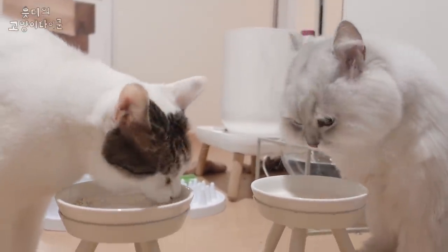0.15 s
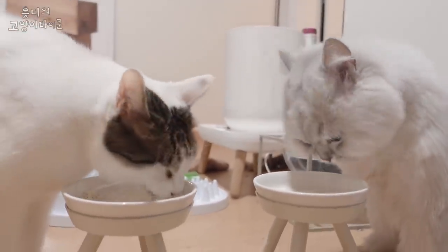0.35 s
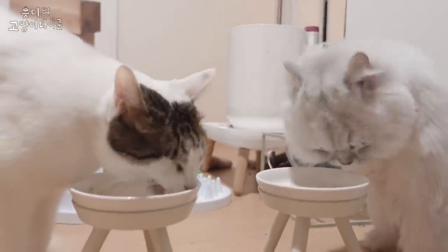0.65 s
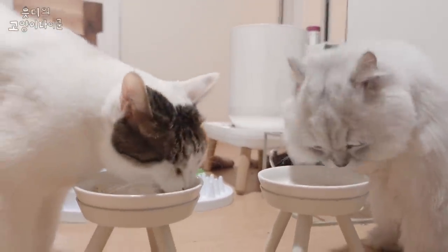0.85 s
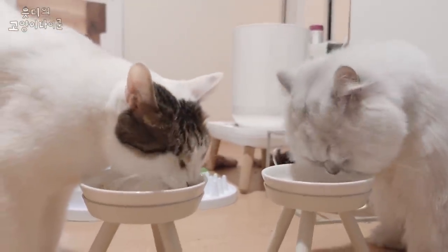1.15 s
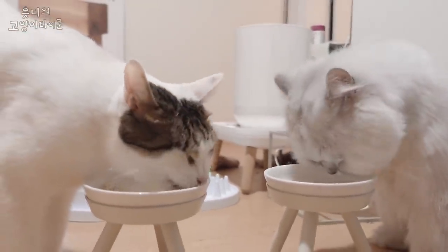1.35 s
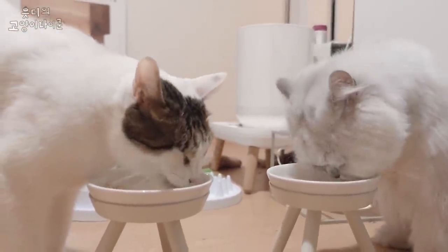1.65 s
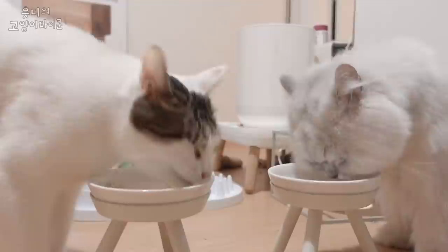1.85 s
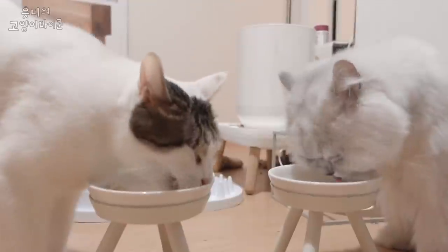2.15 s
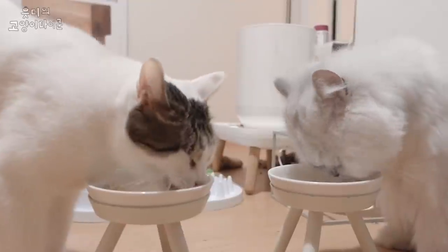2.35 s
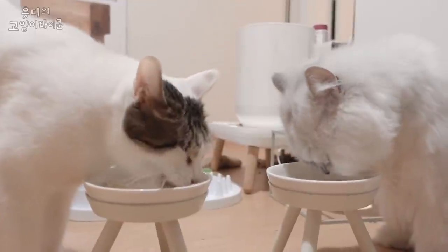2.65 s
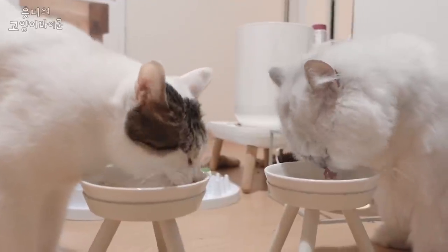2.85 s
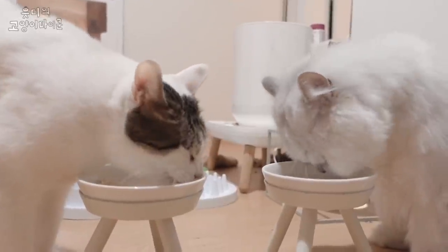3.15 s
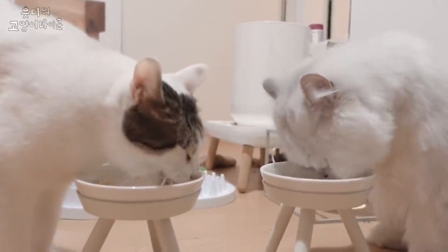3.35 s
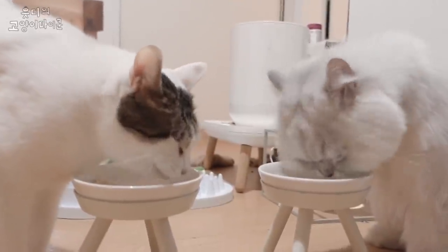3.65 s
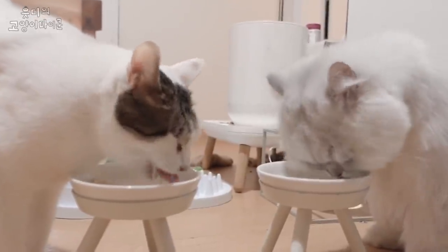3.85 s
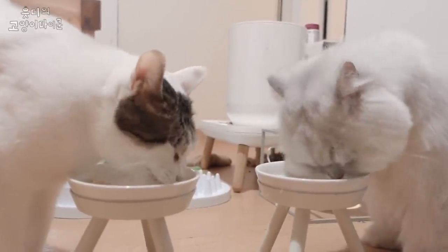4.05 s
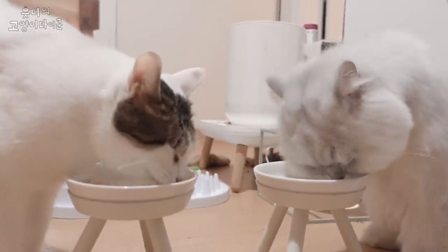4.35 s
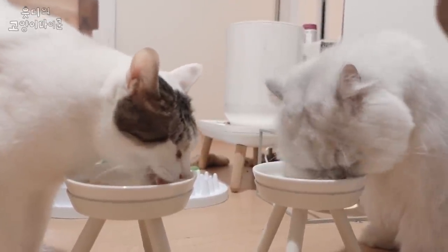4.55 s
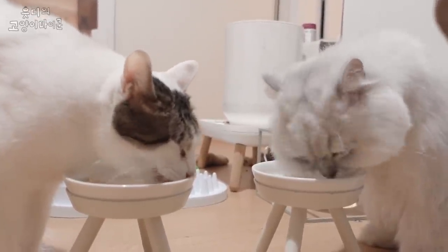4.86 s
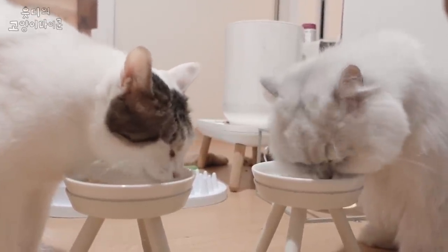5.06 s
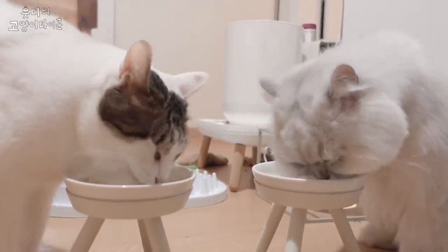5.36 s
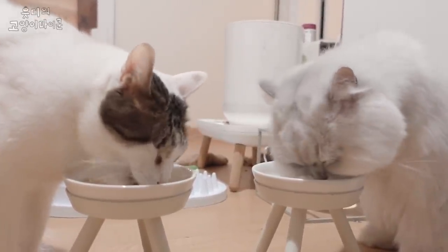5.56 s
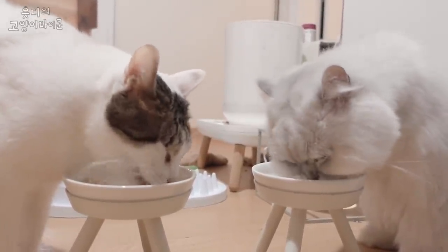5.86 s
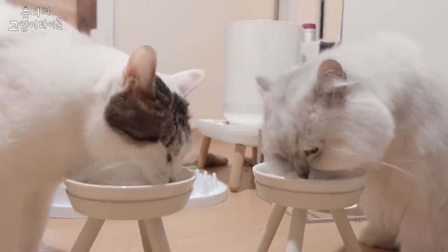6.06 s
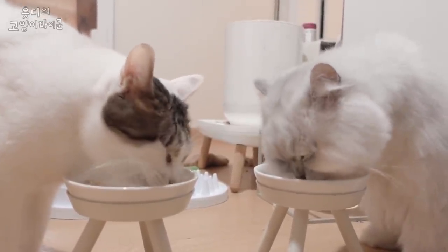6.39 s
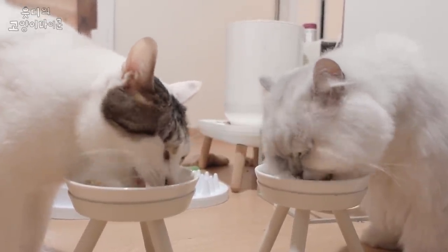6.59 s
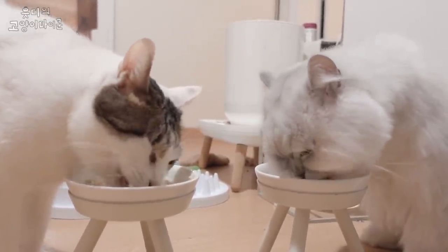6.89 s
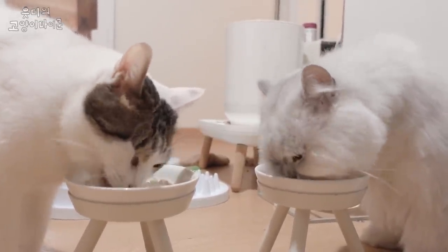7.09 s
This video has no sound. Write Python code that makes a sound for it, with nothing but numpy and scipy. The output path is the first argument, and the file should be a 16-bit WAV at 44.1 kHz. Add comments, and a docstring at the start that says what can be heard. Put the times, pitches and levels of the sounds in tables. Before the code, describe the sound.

Close wet smacking, licking and chewing of two cats at their bowls, with soft stand judders over a low room rumble.

```python
"""Two cats eating wet food

Close by in a small room, tongues lap about three times a second and squelch the food. Saliva films snap,
lips open tiny wet cavities that pop, and saliva crackles after each smack. Licks and nudges shake the
bowls' wooden stands with low judders and a few dull bumps, over a deep rumble and room noise."""
import sys
import numpy as np
from scipy import signal
from scipy.fft import rfft, irfft, next_fast_len
from scipy.io import wavfile
from scipy.ndimage import uniform_filter1d, map_coordinates

SR = 44100
rng = np.random.default_rng(int(sys.argv[2]) if len(sys.argv) > 2 else 0)


def unload_audio(sound):
    """Save the sound as a 16-bit wav file, at the path given as the first command line argument."""
    columns = np.transpose(np.atleast_2d(sound))
    # keep every value between -1 and 1, then stretch to whole-number steps
    steps = np.round(np.clip(columns, -1, 1) * 32767)
    wavfile.write(sys.argv[1], SR, steps.astype(np.int16))


N = 318710

# lip and tongue smacks: start_s, pop_db, cavity_hz, ring_cycles, snap_db
SMACK_EVENTS = [(.0248, -29, 1720, 1.1, -32), (0.0874, -19, 1580, 1.1, -22), (0.1016, -30, 2060, 1.1, -23),
                (0.1119, -17, 1910, 0.72, -11.5), (0.1201, -24, 2200, 1, -19.5),
                (.14, -17.5, 2770, 0.43, -38), (0.3474, -15.5, 3780, 2.2, -39),
                (0.3605, -8, 3890, 2.2, -42), (.4106, -28, 3680, 3, -29), (0.4229, -18, 1910, 0.68, -20),
                (0.4367, -22, 2070, 0.58, -12.5), (.454, -21.5, 1850, 1.2, -39),
                (0.4938, -23, 1750, 1.6, -43), (0.5504, -27, 1730, 1.2, -39), (0.5976, -26, 1690, 1.6, -32),
                (0.7412, -21.5, 2280, 1.4, -23), (0.7653, -23.5, 2610, 0.89, -25),
                (0.8322, -26, 1220, 0.94, -25), (0.853, -25.5, 1870, 1.4, -24),
                (1.0725, -28, 1100, 2.3, -37), (1.101, -31.5, 2660, 2.9, -22.5),
                (1.1694, -24, 2680, 1.7, -39), (1.1896, -14, 2030, 1.1, -21),
                (1.2211, -27.5, 5550, 4.2, -44), (1.242, -18.5, 1960, 0.26, -35),
                (1.559, -30.5, 1640, 2.9, -39), (1.6392, -29.5, 1970, 1.7, -36),
                (1.6828, -21.5, 1140, 1.04, -26.5), (1.8301, -31, 4320, 2.6, -45),
                (2.109, -37, 4330, 3.3, -23), (2.1637, -24.5, 1310, 2.1, -33),
                (2.1811, -24.5, 3750, 3.6, -38), (2.185, -25, 1330, 1.6, -19),
                (2.2024, -18.5, 1630, 1.45, -31), (2.2075, -19, 1660, 1.7, -14),
                (2.2456, -20.5, 2030, 2.2, -29), (2.3462, -34, 1930, 1, -29),
                (2.604, -29.5, 3540, 2, -28.5), (2.636, -33.5, 1330, 1.2, -21), (2.6513, -30, 3520, 2, -34),
                (2.665, -19, 5540, 0.81, -34), (2.699, -26.5, 3750, 3.7, -29),
                (2.7692, -27, 3150, 1.8, -25), (2.9917, -21.5, 1650, 0.84, -42),
                (3.0318, -28.5, 2160, 2, -33), (3.521, -29.5, 2220, 0.88, -28.5),
                (3.6537, -22, 1700, 1.1, -51), (3.6662, -24, 1690, 1.6, -27.5),
                (3.817, -22, 5640, 4.5, -24.5), (3.8904, -26, 6450, 1.7, -20),
                (3.905, -15.5, 1200, 1.33, -33), (3.9927, -26.5, 1740, 1.9, -30),
                (4.1886, -21, 2400, 0.58, -22), (4.2023, -29.5, 2110, 1.7, -25.5),
                (4.2294, -26, 2120, 2.1, -34), (4.565, -25.5, 1620, 0.63, -41),
                (4.5796, -21.5, 1160, 1.04, -30), (4.856, -19, 2040, 0.3, -29.5),
                (4.9075, -32, 4640, 6.5, -19), (4.9699, -20, 1900, 0.94, -46), (5.268, -28, 1340, 1.1, -37),
                (5.2785, -19.5, 1400, 1.3, -40), (5.5515, -13, 1380, 0.99, -14.5),
                (5.5627, -10.5, 2460, 1.5, -33), (5.577, -13, 1650, 0.19, -23),
                (5.6278, -45, 1720, 0.9, -23), (5.695, -32, 1750, 0.77, -27), (5.883, -23, 2820, 0.34, -26),
                (6.1548, -14, 1450, 0.41, -24), (6.2005, -21.5, 1330, 0.71, -29),
                (6.5124, -21, 1490, .4, -35), (6.651, -31.5, 2580, 3.3, -41),
                (6.9804, -17.5, 2800, 2.1, -16), (7.1274, -21.5, 1460, 0.33, -36),
                (7.1492, -24, 1240, 0.68, -26)]
# droplet spray spectrum: freq_hz, level_db
SPRAY_SPECTRUM = [(3000, -51), (6000, -6), (7500, 9), (9500, 11), (11300, 2), (12700, -21), (16000, -38)]


def amp(db):
    """Decibels to gain."""
    return 10 ** (np.asarray(db) / 20)


def unit(x):
    """Scale to rms 1."""
    return x / np.sqrt(np.mean(x ** 2) + 1e-20)


def along(points, hz):
    """Read (freq_hz, value) points on a log axis."""
    freq_hz, values = np.transpose(points)
    return np.interp(np.log(hz + 1), np.log(freq_hz + 1), values)


def curve(points):
    """Read (time_s, value) points at every sample."""
    return np.interp(np.arange(N) / SR, *np.transpose(points))


def wobble(rate_hz):
    """Smooth random curve, rate_hz knots a second."""
    knots = rng.standard_normal(int(N * rate_hz / SR) + 4)
    return map_coordinates(knots, [np.arange(N) * rate_hz / SR])


def swell(length_s):
    """Smooth rise and fall, above half height for length_s."""
    return np.hanning(round(2 * length_s * SR))


def noise():
    """Fresh white noise."""
    return rng.standard_normal(N)


def filtered(x, response):
    """Apply a frequency response."""
    size = next_fast_len(len(x) + 4096)
    return irfft(rfft(x, size) * response(np.fft.rfftfreq(size, 1 / SR)), size)[:len(x)]


def coloured(x, spectrum):
    """Shape by (freq_hz, level_db) points, at rms 1."""
    return unit(filtered(x, lambda hz: amp(along(spectrum, hz))))


def resonated(x, centre_hz, width_ratio):
    """Two equal resonances in series, at rms 1."""
    def response(hz):
        damping = 1j * hz * width_ratio * centre_hz
        return (damping / (centre_hz ** 2 - hz ** 2 + damping)) ** 2
    return unit(filtered(x, response))


def add(track, start_s, sound):
    """Mix a sound into a track."""
    first = round(start_s * SR)
    part = sound[max(-first, 0):max(N - first, 0)]
    track[max(first, 0):][:len(part)] += part


def placed(start_s, sounds):
    """Sum one short sound per row, each at its start."""
    index = np.round(np.abs(start_s) * SR).astype(int)[:, None] + np.arange(sounds.shape[1])
    return np.bincount(index.ravel(), sounds.ravel(), N)[:N]


def background(rumble_db=-3, air_db=-47):
    """Deep unsteady rumble, soft room noise and faint drones."""
    # rumble swells: time_s, level_db
    rumble_levels = [(0, -11), (.82, -8.5), (.95, -15.5), (3.7, -14), (4.02, -10.5), (4.19, -19.5),
                     (4.77, -13.5), (6.6, -17.5), (7.23, -9)]
    # rumble and room noise spectra: freq_hz, level_db
    rumble_spectrum = [(3, -3.5), (8, -1.5), (24, -3.5), (34, -29), (50, -33), (70, -51), (120, -58),
                       (250, -96)]
    air_spectrum = [(40, -43), (80, -2.5), (140, -7.5), (210, -9.5), (265, -8), (330, -5), (650, -17),
                    (1170, -11.5), (1450, -24.5), (2400, -21), (3200, -31.5), (4750, -37.5), (7500, -41.5),
                    (16000, -52)]
    # steady drones: centre_hz, nominal_width_hz, level_db
    drone_bands = [(80.2, 8.3, -43.5), (260.4, 24, -49.5), (589, 25, -61)]
    rumble = coloured(noise(), rumble_spectrum)
    rumble /= np.sqrt(np.abs(uniform_filter1d(rumble ** 2, size=8000)) + 0.067)  # evens out gusts
    drones = sum(amp(db) * resonated(noise(), hz, 1.9 * width_hz / hz)
                 for hz, width_hz, db in drone_bands)
    air = amp(air_db) * coloured(noise(), air_spectrum)
    return amp(curve(rumble_levels) + rumble_db) * rumble + air + drones


def room(x, tail_db=-3, build_s=0.011, blocks=16):
    """Near surfaces echo, then a short tail builds and dies; both vary by block as the heads move."""
    # room decay: freq_hz, t60_s
    decay = [(200, 0.48), (1500, 0.15), (5000, 0.17), (12000, 0.12)]
    # near surfaces: delay_s, level_db
    echoes = [(.0012, -56), (.0031, -5.5), (.0084, -11), (.0103, -48), (0.013, -5), (.0165, -24)]
    # wall response: freq_hz, gain_db
    walls = [(100, -12), (700, -8.5), (1300, -4.5), (2400, -6), (3000, -7), (3800, -10), (5800, -5.5),
             (7000, -3.5), (11000, -6.5), (16000, -5)]
    out = np.zeros(N)
    for block in np.array_split(np.arange(N), blocks):
        hz, t, bins = signal.stft(rng.standard_normal(SR // 2), SR, nperseg=256)
        tail = signal.istft(bins * amp(-60 * t / along(decay, hz)[:, None]), SR, nperseg=256)[1]
        tail *= 1 - np.exp(-(np.arange(len(tail)) / SR / build_s) ** 2)
        tail *= amp(tail_db) / np.linalg.norm(tail)
        for delay_s, db in echoes:
            tail[round(delay_s * SR * rng.uniform(.9, 1.1))] += amp(db)
        add(out, block[0] / SR, signal.fftconvolve(x[block], tail))
    return filtered(out, lambda hz: amp(along(walls, hz)))


def stand_rings():
    """A tapped wooden stand rings in three ways: slow sway, boom and higher knock."""
    # stand modes: freq_hz, level_db, t60_s, kind (0 sway, 1 boom, 2 knock)
    modes = [(43, 10.5, 0.22, 0), (83.9, -3, 0.27, 1), (262.7, 2, 0.12, 2), (275, -6, 0.23, 2),
             (333.5, -2, 0.08, 2)]
    t = np.arange(SR // 2) / SR
    rings = np.zeros((3, len(t)))
    for hz, db, t60_s, kind in modes:
        rings[kind] += amp(db - 60 * t / t60_s) * np.sin(2 * np.pi * hz * t)
    return rings


def bumps(gain_db=1, attack_s=0.0041, contact_s=0.0025):
    """A soft muzzle knocks a bowl, or a lick shoves it, and the stand rings dully."""
    # muzzle blows, and at 2.798 s a bowl pushed by a lick: start_s, sway_db, boom_db, knock_db
    hits = [(1.3314, -17, -6, -17.5), (2.735, -18.5, -15, -36.5), (2.798, -40, -40, -24.5),
            (4.312, -31, -13, -33), (6.096, -16, -55, -63), (6.128, -17, -4, -13), (6.829, -16, -38, -39)]
    rings = stand_rings()
    start_s, *levels_db = np.transpose(hits)
    t = np.arange(rings.shape[1]) / SR
    ringing = amp(np.transpose(levels_db) + gain_db) @ rings
    knocks = placed(start_s, ringing * (1 - np.exp(-t / attack_s)))
    blow = np.sin(np.pi * np.minimum(t / contact_s, 1)) ** 2  # fur spreads the force
    return signal.fftconvolve(knocks, blow / blow.sum())[:N]


def nudges(push_s=0.058, slip_spread_db=5, judder_t60_s=0.19, ring_db=-1.5, knock_db=-9, rub_db=-5):
    """The bowl slips under the tongue: it judders, rubs and rings the stand."""
    # licks that push a bowl: middle_s, boom_db, judder_db, judder_hz
    licks = [(.254, -25.5, -50, 131), (0.364, -36, -39, 392), (0.472, -29.5, -43, 143),
             (.558, -47, -34.5, 153.4), (.688, -41, -37.5, 240), (.826, -32.5, -34, 273),
             (0.889, -35.5, -35, 199), (2.12, -20.5, -32, 205), (2.247, -38, -36.5, 135),
             (3.419, -22.5, -36, 272.4), (3.627, -22, -30.5, 134), (3.819, -32.5, -37, 250),
             (3.935, -19.5, -27, 205), (3.97, -16, -27.5, 272), (4.076, -23, -42, 246),
             (4.807, -30, -36, 136), (5.048, -18, -28, 144.6), (5.146, -21, -27, 123),
             (5.249, -22.5, -36.5, 152), (5.407, -29, -29.5, 140), (6.284, -25, -37, 142),
             (6.388, -33, -29, 273.6), (6.552, -33.5, -31.5, 267), (7.065, -21, -34, 260),
             (7.162, -19.5, -29, 258)]
    # rubbing spectrum: freq_hz, level_db
    rub_spectrum = [(50, -32), (110, -12), (150, 1), (220, 1), (300, -16.5), (400, -19), (600, -19.5),
                    (1000, -31), (2000, -59)]
    _, boom_ring, knock_ring = stand_rings()
    t = np.arange(len(boom_ring)) / SR
    push = swell(push_s)
    size = len(push)
    out = np.zeros(N)
    for middle_s, boom_db, judder_db, judder_hz in licks:
        slips = push * rng.standard_normal(size)
        slips *= amp(slip_spread_db * rng.standard_normal(size))  # mostly tiny, a few large
        judder_ring = amp(-60 * t / judder_t60_s) * np.sin(2 * np.pi * judder_hz * t)
        parts = [(boom_db, signal.fftconvolve(slips, boom_ring)),
                 (judder_db + knock_db, signal.fftconvolve(slips, knock_ring)),
                 (judder_db + ring_db, signal.fftconvolve(slips, judder_ring)),
                 (judder_db + rub_db, coloured(push * rng.standard_normal(size), rub_spectrum))]
        for db, sound in parts:  # energy: that of db held for push_s
            add(out, middle_s - push_s, amp(db) * sound * np.sqrt(size / 2 / np.sum(sound ** 2)))
    return out


def pops(hz, ring_s, glide):
    """Small wet cavities: each peaks at ring_s and dies, rising slightly in pitch as it opens."""
    t = np.arange(SR // 125) / SR
    age = t / np.reshape(ring_s, (-1, 1))
    pitch_hz = hz[:, None] * (1 + glide * np.tanh(age - 1))
    return (age * np.exp(1 - age)) ** 2 * np.sin(2 * np.pi * np.cumsum(pitch_hz, axis=1) / SR)


def spray(start_s, level_db, rise_s):
    """A puff of fine droplets at each start."""
    age = np.arange(SR // 125) / SR / rise_s
    puffs = amp(level_db)[:, None] * (age * np.exp(1 - age)) ** 2
    return placed(start_s, puffs) * coloured(noise(), SPRAY_SPECTRUM)


def crackle(low_hz, high_hz, cycles, spread_db, count):
    """Tiny saliva bubbles burst at random, most of them faintly; rms 1."""
    when, pitch, faintness = rng.random((count, 3)).T
    hz = low_hz * (high_hz / low_hz) ** pitch
    strength = amp(-spread_db * np.log(faintness + .02))
    return unit(placed(when * N / SR, strength[:, None] * pops(hz, cycles / hz, glide=0.0067)))


def tongues(lap_hz=3.2, lap_db=2, first_lap_s=0.043, chew_db=-35, chew_t60_s=0.38):
    """Saliva crackle pulses with the lapping and swells after each smack."""
    # tongue activity: time_s, level_db
    activity = [(0.0, -46.5), (0.16, -54.5), (1.14, -59.5), (1.33, -57), (2.17, -52), (5.45, -51.5),
                (5.72, -50.5), (5.96, -55.5), (6.62, -58.5), (7.23, -51.5)]
    large = amp(-1) * crackle(1210, 3000, cycles=2.1, spread_db=4, count=1300)
    small = amp(-7) * crackle(3360, 6170, cycles=2.56, spread_db=4, count=2800)
    fine = amp(-14) * crackle(7380, 14200, cycles=1.5, spread_db=5.5, count=2000)
    start_s, pop_db, _, _, snap_db = np.transpose(SMACK_EVENTS)
    t = np.arange(N) / SR
    strength = np.hypot(amp(pop_db), amp(snap_db))
    decay = amp(chew_db - 60 * t[:SR // 4] / chew_t60_s)
    chewing = np.sqrt(placed(start_s, (strength[:, None] * decay) ** 2))
    lapping = amp(curve(activity) + lap_db * np.cos(2 * np.pi * lap_hz * (t - first_lap_s)))
    return np.hypot(lapping, chewing) * (large + small) + lapping * fine


def squelches(wet_db=-0.5, fizz_db=-14, grain_db=6, width_ratio=0.33, width_at_hz=4500):
    """Bursting froth resonates in the gap between tongue and food; harder strokes fizz more."""
    # tongue strokes: middle_s, length_s, pitch_hz, level_db
    strokes = [(0.022, 0.063, 3540, -45), (0.104, 0.067, 3800, -38.5), (0.299, 0.036, 3730, -49),
               (0.433, 0.03, 4460, -54), (0.623, 0.075, 3870, -49), (0.761, 0.055, 4860, -53),
               (0.849, 0.051, 5300, -51), (0.936, 0.032, 4400, -51.5), (1.172, 0.054, 4700, -46),
               (1.237, 0.054, 5300, -48), (1.528, .055, 4400, -55), (1.918, 0.018, 4660, -49.5),
               (2.122, .05, 5270, -49.5), (2.213, 0.064, 5400, -49.5), (2.373, 0.059, 3530, -49),
               (2.651, 0.09, 3500, -58), (2.803, 0.068, 4300, -47), (2.89, 0.043, 4150, -42),
               (3.043, 0.038, 3470, -46.5), (3.215, 0.039, 6040, -48.5), (3.398, 0.058, 8850, -47),
               (3.53, 0.053, 2800, -45.5), (3.915, .07, 8500, -53), (4.315, 0.14, 4750, -53),
               (4.596, 0.06, 5840, -51), (4.894, 0.11, 4440, -50), (5.608, 0.1, 5560, -52.5),
               (5.827, 0.044, 3320, -43), (6.276, 0.083, 4730, -57), (6.527, 0.063, 4100, -52),
               (6.648, 0.052, 2640, -52.5), (6.875, 0.083, 4000, -50), (7.006, 0.042, 3900, -44)]
    froth = unit(noise() * amp(grain_db * wobble(rate_hz=700)))
    wet, fizzing = np.zeros(N), np.zeros(N)
    for middle_s, length_s, pitch_hz, db in strokes:
        stroke = swell(length_s)
        burst = froth[rng.integers(N - SR):][:len(stroke)]
        # a tighter seal rings lower and narrower, close to a squeak
        gap = resonated(burst, pitch_hz, width_ratio * pitch_hz / width_at_hz)
        add(wet, middle_s - length_s, amp(db + wet_db) * stroke * gap)
        add(fizzing, middle_s - length_s, amp(db + fizz_db) * stroke)
    return wet + fizzing * coloured(froth, SPRAY_SPECTRUM)


def threads(ping_hz=11000, ping_db=-4, mist_db=-8):
    """Saliva threads break, each with a tiny high ping in a puff of spray."""
    # thread breaks: start_s, level_db
    breaks = [(0.0762, -27), (0.1111, -26), (0.2224, -34), (0.4214, -25), (0.4359, -16), (0.7402, -34),
              (1.8163, -29), (2.1081, -34), (2.4867, -21.5), (2.6783, -24), (3.3174, -20), (3.3787, -23),
              (3.681, -37), (3.8901, -27), (4.794, -23), (5.8127, -27.5), (5.8815, -26), (6.9795, -38)]
    start_s, db = np.transpose(breaks)
    hz = ping_hz * np.exp(0.044 * rng.standard_normal(len(start_s)))
    pings = amp(db + ping_db)[:, None] * pops(hz, ring_s=0.00022, glide=0.0081)
    return placed(start_s, pings) + spray(start_s, db + mist_db, rise_s=0.00037)


def smacks(cavity_gain_db=1.48, film_hz=4470, film_ring_s=0.00028, glide=0.0045, spray_db=-30.5,
           strays=3, stray_db=-16, stray_spread_s=0.003, stray_detune=0.14):
    """A saliva film snaps, the mouth cavity behind it pops, and fine spray follows."""
    start_s, pop_db, cavity_hz, ring_cycles, snap_db = np.transpose(SMACK_EVENTS)

    def burst(pitch_ratio):
        cavity = pops(cavity_hz * pitch_ratio, ring_cycles / cavity_hz, glide)
        film = pops(np.full(len(start_s), film_hz) * pitch_ratio, film_ring_s, glide)
        return amp(pop_db + cavity_gain_db)[:, None] * cavity + amp(snap_db)[:, None] * film

    out = placed(start_s, burst(0.99))
    # the film tears unevenly: weaker bubbles give way around the main one
    for shift, pitch, size in rng.standard_normal((len(start_s), strays, 3)).transpose(1, 2, 0):
        bubbles = amp(stray_db + 2 * size)[:, None] * burst(np.exp(stray_detune * pitch))
        out += placed(start_s + stray_spread_s * shift, bubbles)
    return out + spray(start_s, snap_db + spray_db, rise_s=0.0016)


def scene():
    """Mouths with their room echo, stands and background, in mono."""
    # mouth radiation: freq_hz, gain_db
    muzzle = [(300, -1), (800, -11.5), (1200, -1), (2400, 0), (2950, -1), (3500, 0), (6000, 0), (6600, -1),
              (8000, -6), (11800, -2), (12800, -5.5), (16000, -5)]
    eating = smacks() + threads() + squelches() + tongues()
    mouths = filtered(eating, lambda hz: amp(along(muzzle, hz)))
    return (mouths + room(mouths) + nudges() + bumps() + background())[None]


def record(dry):
    """Soft start and stop; nothing above top_hz."""
    top_hz = 16400
    fades = signal.windows.tukey(N, .002)
    return filtered(dry[0] * fades, lambda hz: hz < top_hz)[None]


dry = scene()
out = record(dry)
unload_audio(out)
```